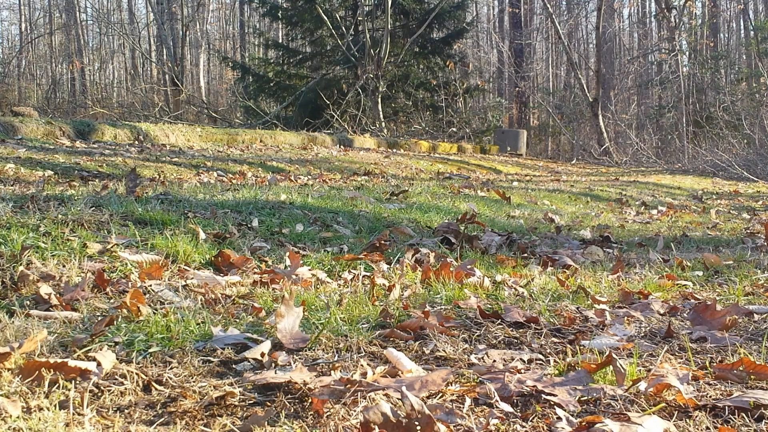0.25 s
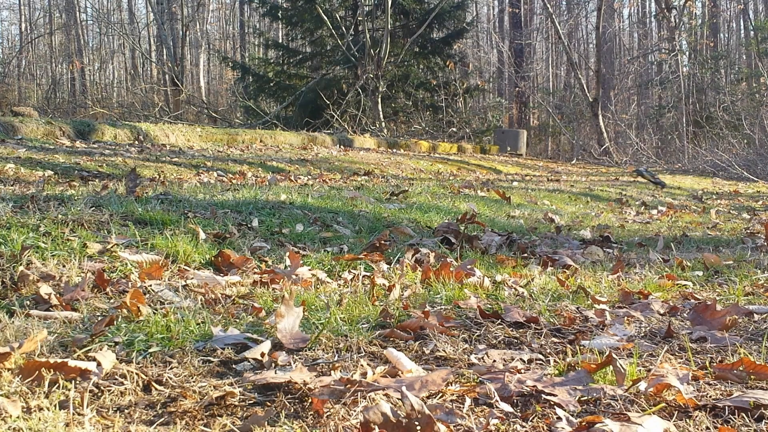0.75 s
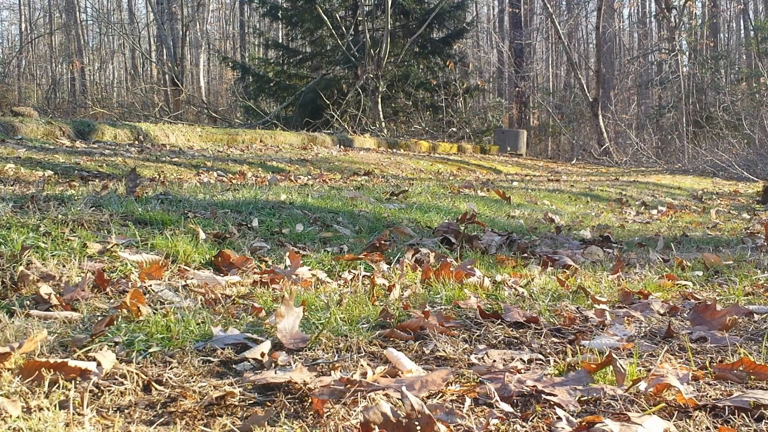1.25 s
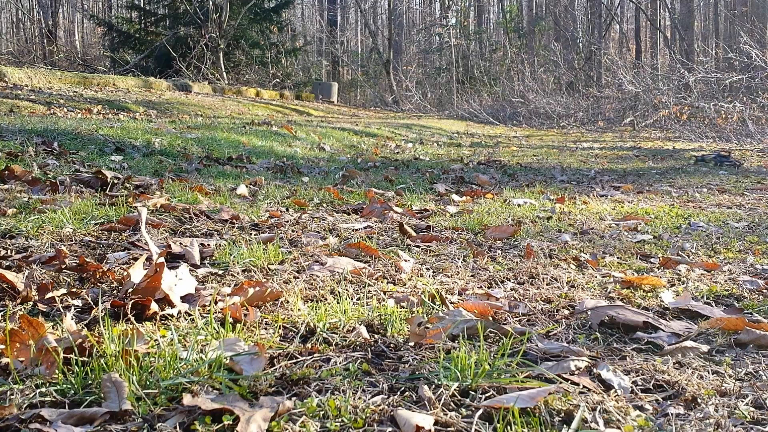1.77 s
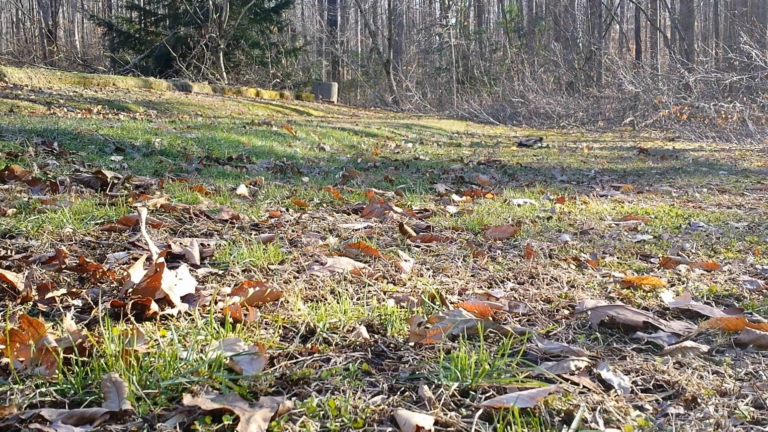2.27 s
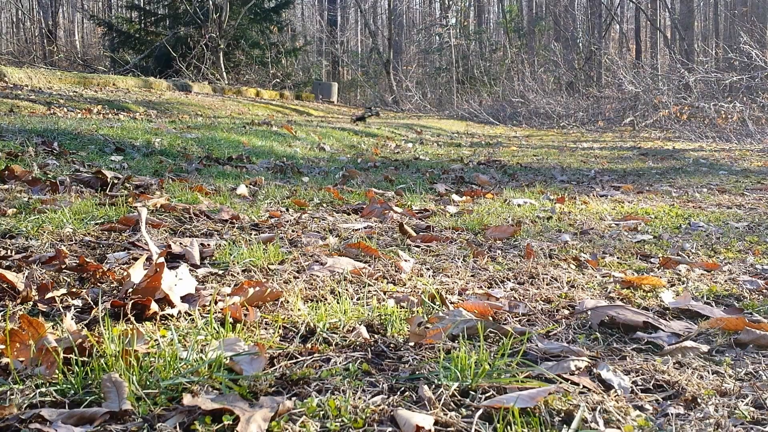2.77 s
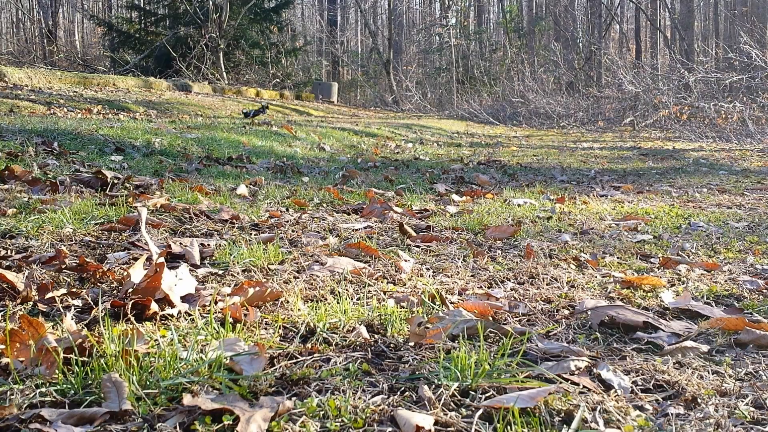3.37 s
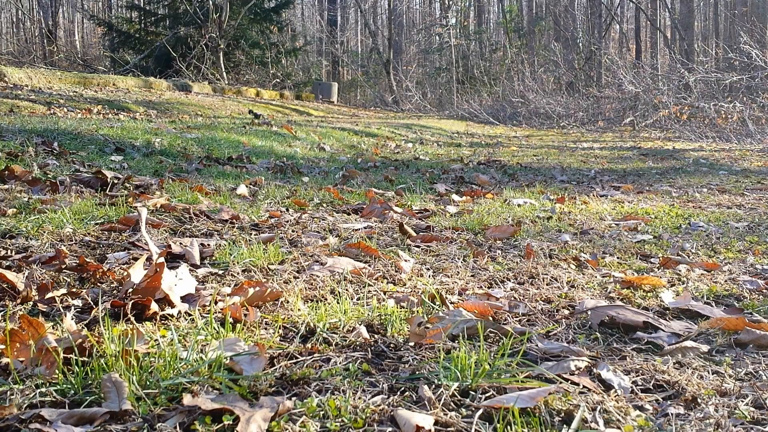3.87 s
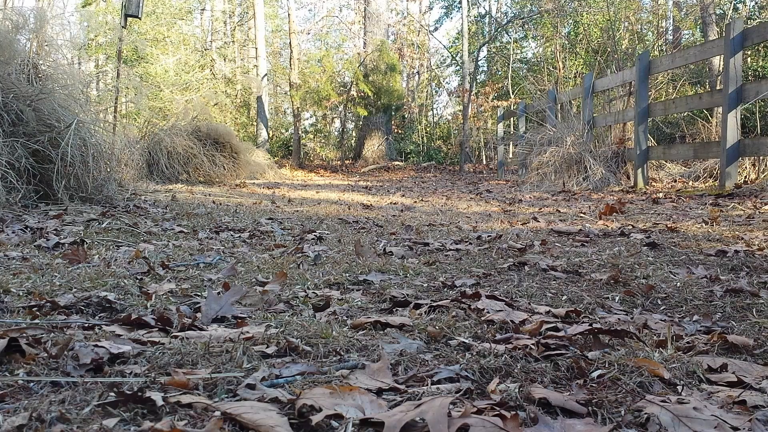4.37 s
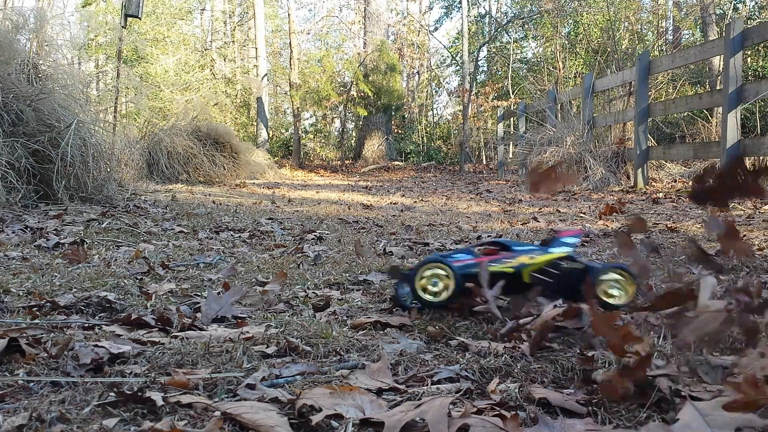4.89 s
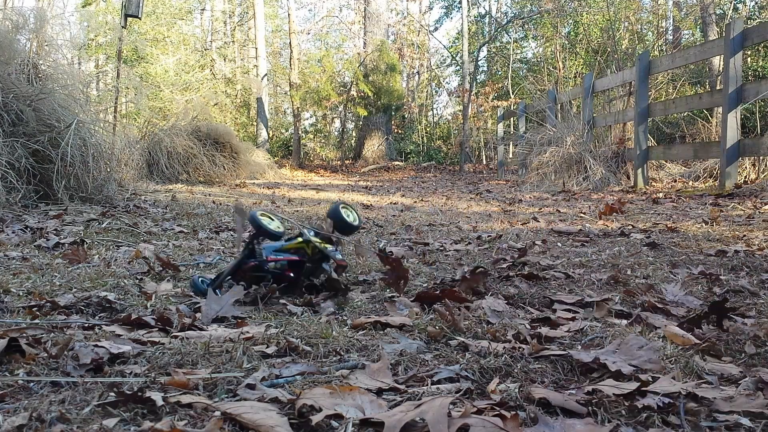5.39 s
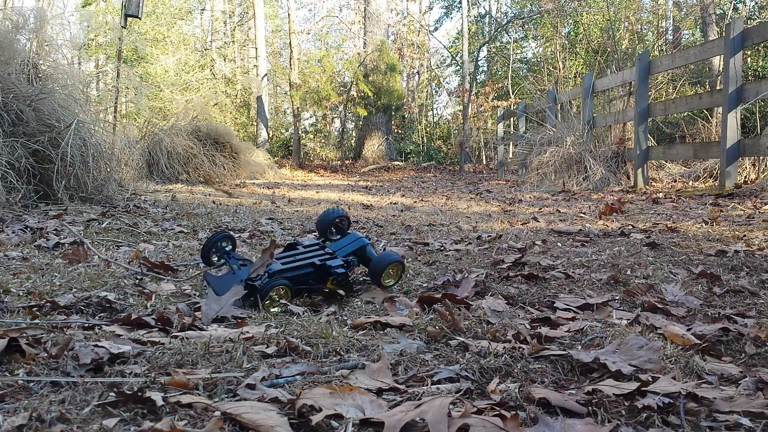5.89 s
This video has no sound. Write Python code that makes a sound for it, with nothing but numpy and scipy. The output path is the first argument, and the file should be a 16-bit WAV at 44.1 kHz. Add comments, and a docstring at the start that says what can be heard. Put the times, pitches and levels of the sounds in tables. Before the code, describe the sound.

A small electric buggy races some way off across a lawn of dry leaves, its tyres rustling, its plastic chassis rattling and bumping, its gears giving tiny high chirps. After about four seconds it is suddenly right at the microphones, crunching loudly through the leaves with a brief motor hum. It flips with a few hollow knocks, and disturbed leaves crackle on. The sound is open-air stereo with a faint low rumble.

```python
"""A small electric buggy on a lawn of dry leaves, heard from a stereo pair of microphones in the open air.
For four seconds it races some way off: tyres crush leaves, the plastic chassis rattles and lands, and the
gears chirp downward as the wheels grip. Then, abruptly, it is right at the microphones, and the motor hums
as the wheels lift. At 5.3 s it flips, its hollow shell knocking on the ground, and stirred leaves crackle
round it. Trees return a faint echo; a low background ducks during the close pass and recovers."""
import sys
import numpy as np
from scipy import signal
from scipy.fft import rfft, irfft
from scipy.io import wavfile
from scipy.ndimage import map_coordinates

SR = 44100
rng = np.random.default_rng(int(sys.argv[2]) if len(sys.argv) > 2 else 0)


def materialize(psi):
    """Save the field psi as 16-bit PCM at rate SR to the path in sys.argv[1].

    A 1-D psi becomes a single channel; in a 2-D psi each row is a channel.
    """
    bounded = np.clip(np.atleast_2d(psi).T, -1, 1)
    quanta = np.round(bounded * 32767).astype(np.int16)
    wavfile.write(sys.argv[1], SR, quanta)


N = 270731
T = np.arange(N) / SR
CLOSE_S = 4.072   # from here on the car is close to the microphones
USUAL_RUSTLE_DB, USUAL_PITCH_HZ = -40, 6500

# Leaves under the tyres, far off and close by. Each row: time in seconds, relative level in dB.
FAR_RUSTLE_LEVEL = [(0.0, -31), (0.07, -40), (0.51, -48.5), (0.76, -46.5), (0.99, -46.5), (1.53, -44.5),
                    (1.85, -41), (2.14, -49.5), (2.37, -47.5), (2.53, -38), (2.69, -42.5), (2.85, -52.5),
                    (3.36, -56.5), (3.56, -58.5), (3.84, -61.5), (4.06, -69)]
CLOSE_RUSTLE_LEVEL = [(4.08, -25), (4.11, -20), (4.51, -23), (4.55, -22), (4.98, -38.5), (5.13, -40.5),
                      (5.41, -48), (5.42, -38.5), (5.46, -46.5), (5.98, -33), (6.0, -40), (6.14, -37.5)]
# Colour of the leaves at each distance. Each row: frequency in Hz, relative level in dB.
FAR_LEAF_SPECTRUM = [(1000, -30), (1700, -20), (2300, -14), (3100, -9.5), (3700, -10.5), (4800, -10),
                     (5800, -0.5), (6600, 6.5), (7400, 3.5), (8800, -2.5), (11500, -1.5), (15000, -4.5),
                     (15800, -4)]
CLOSE_LEAF_SPECTRUM = [(880, -62.5), (1500, -21), (2900, -10.5), (4430, -12), (6450, 4), (8330, -14),
                       (14700, -28), (15800, -52)]
# Pitch of the rustle, lower where the leaves are larger. Each row: time in seconds, pitch in Hz.
RUSTLE_PITCH = [(0, 6656), (.5, 6824), (.8, 6060), (1.15, 5930), (1.3, 6490), (2.64, 6733), (2.8, 5866),
                (3.3, 6382), (4.25, 6513), (4.42, 6124), (4.55, 6640), (4.9, 6870), (5.1, 6414),
                (6.14, 6550)]
# A wheel crushes a clump of leaves. Each row: time in seconds, relative peak in dB.
LEAF_CLUMPS = [(0.05, -36), (0.087, -37), (0.44, -45), (0.505, -47), (0.765, -53), (0.81, -46),
               (0.843, -41), (0.895, -40), (0.945, -42.5), (1.026, -38), (1.098, -39.5), (1.16, -42.5),
               (1.207, -33), (1.226, -38), (1.975, -35), (2.382, -40), (2.52, -37), (2.8, -42),
               (2.893, -41.5), (3.03, -46), (3.335, -59), (3.635, -59), (4.165, -30), (4.55, -20.5),
               (4.61, -20), (4.92, -45), (5.16, -34), (5.43, -56), (5.69, -40), (5.98, -50)]
# Single leaves and twigs snap.
# Each row: start in seconds, relative peak in dB, ring in Hz, left over right in dB.
LEAF_SNAPS = [(0.017, -22.5, 7300, -13), (0.1803, -29.5, 6900, -14), (0.6524, -27.5, 6540, 5),
              (0.8358, -31.5, 6200, 1.5), (1.1954, -26, 6900, -3), (1.2186, -25, 6550, 1),
              (1.8562, -24.5, 6860, 2), (1.8935, -17.5, 6780, 3.5), (1.924, -22, 8000, 0),
              (1.9501, -25, 6540, -2), (2.575, -33, 6800, 1), (2.6511, -37, 6850, -1),
              (2.7977, -31.5, 5200, 4), (2.826, -28, 5300, -1), (2.8813, -33, 5700, -21),
              (3.117, -36, 5960, 11), (4.1558, -15, 6360, 1.5), (4.3028, -13, 6463, 4.5),
              (4.3666, -14.5, 6096, 10), (4.4128, -14.5, 5830, 11), (4.5442, -11, 6500, -15),
              (4.6586, -16.5, 6460, 2), (4.7176, -18, 5950, 0), (5.0527, -27, 6500, -4.5),
              (5.8387, -24.5, 6540, -12), (5.8771, -23, 7160, -12), (5.9415, -26, 6760, 3),
              (5.984, -21, 6390, 14)]
# The ground shakes the chassis on the distant run. Each row: time in seconds, relative level in dB.
FAR_SHAKE_LEVEL = [(0.0, -46), (0.46, -50), (0.64, -56), (1.04, -54), (1.76, -43.5), (2.53, -47.5),
                   (2.66, -55), (3.55, -53), (3.83, -57), (4.06, -65)]
# Colour of the chassis at each distance. Each row: frequency in Hz, relative level in dB.
FAR_CHASSIS_SPECTRUM = [(40, -24), (90, -19), (180, -6), (280, -4.5), (480, -3.5), (750, 0.5), (1100, 0.5),
                        (1450, -0.5), (1900, -9.5), (3000, -16)]
CLOSE_CHASSIS_SPECTRUM = [(40, -35), (90, -11), (150, -8.5), (300, -3), (480, 0.5), (750, 2.5), (1100, 5),
                          (1500, 4.5), (2100, -5.5), (3200, -5)]
# Wheels and chassis land. Each row: start in seconds, relative peak in dB.
LANDING_BLOWS = [(0.015, -35), (0.078, -36.5), (0.226, -35.5), (0.388, -36.5), (0.482, -37), (0.545, -41),
                 (0.603, -39), (0.833, -40), (1.2, -30), (1.212, -50), (1.307, -33.5), (1.386, -34.5),
                 (1.48, -49), (1.533, -34.5), (1.654, -36.5), (1.734, -33), (1.875, -33), (1.925, -37),
                 (1.967, -32), (2.137, -34.5), (2.314, -35.5), (2.373, -38.5), (2.445, -38), (2.504, -34),
                 (2.574, -37), (2.618, -37), (3.021, -38.5), (3.113, -32.5), (3.16, -32.5), (3.322, -38.5),
                 (3.568, -44.5), (3.608, -34), (3.689, -41), (4.093, -25), (4.123, -33), (4.201, -24.5),
                 (4.298, -26.5), (4.342, -32.5), (4.5, -29), (4.643, -27.5), (4.88, -35.5), (5.129, -43.5),
                 (5.48, -41.5)]
# Thin high tones: falling gear chirps, and a few nearly steady rings near 7 and 9 kHz.
# Each row: start in seconds, length in seconds, starting pitch in Hz,
# share of pitch lost from 0 to 1, relative level in dB.
HIGH_TONES = [(0.066, 0.022, 9220, 0.03, -47), (0.124, 0.031, 7100, 0.05, -39.5),
              (0.19, 0.33, 7150, 0.15, -50), (0.233, .017, 9500, 0.42, -42.5),
              (0.457, 0.034, 8300, 0.2, -51), (0.948, 0.35, 9270, 0.03, -61.5),
              (1.397, .018, 10000, 0.39, -43.5), (1.532, 0.04, 10450, 0.21, -46),
              (1.75, .023, 9240, 0.3, -41.5), (2.145, .028, 9300, 0.2, -39),
              (2.503, 0.012, 9400, 0.29, -37), (2.616, 0.014, 9750, 0.31, -35.5),
              (2.639, 0.029, 7000, 0.01, -37.5), (3.02, 0.017, 11900, 0.18, -55),
              (3.168, 0.013, 11400, 0.17, -61), (3.624, 0.042, 9580, 0.3, -54),
              (4.876, 0.073, 7640, 0.08, -36.5), (5.325, 0.01, 10900, .1, -57),
              (5.414, .011, 7800, 0, -39.5)]
# The motor as the car passes. Each row: time in seconds, speed in turns per second.
MOTOR_SPEED = [(4.71, 344), (4.74, 308), (4.775, 374), (4.79, 450), (4.803, 460), (4.82, 365), (4.85, 312),
               (4.88, 320), (4.94, 360)]
# What the shell radiates of the motor's harmonics. Each row: frequency in Hz, relative gain in dB.
SHELL_RESPONSE = [(200, -6), (320, -8), (450, 5.5), (680, 6.5), (920, 2.5), (1150, -2), (1450, -11),
                  (2200, -13), (4000, -42)]
# The shell strikes the ground as the car flips. Each row: time in seconds, relative strength in dB.
TUMBLE_BLOWS = [(5.304, -35), (5.327, -37.5), (5.331, -27.5), (5.338, -28), (5.346, -29.5), (5.481, -41)]
# Modes of the shell. Each row: frequency in Hz, relative level in dB, seconds to fall 60 dB.
SHELL_RESONANCES = [(427.4, -12, 0.047), (584.5, -11, 0.037), (726, -8, 0.056), (824, -6, 0.071),
                    (1009, -5, 0.051), (1147, 5, 0.033), (1440, 0.5, 0.032), (1750, -8, 0.022),
                    (2130, 11, 0.02)]
# Bearing of the car. Each row: time in seconds, lead of the left microphone in milliseconds.
LEFT_LEAD = [(0, 0.015), (.7, 0.099), (1.6, 0.18), (3.3, -0.086), (4.06, -.083), (4.08, 0.35), (4.6, 0.32),
             (5.1, -0.086), (5.5, 0.18), (6.14, 0.049)]
# Level of the low background as heard, ducking during the loud close pass and then recovering.
# Each row: time in seconds, relative level in dB.
BACKGROUND_LEVEL = [(0, -54.5), (2.7, -51.5), (4.06, -56), (4.1, -56), (4.75, -61), (4.95, -73),
                    (5.35, -66), (6.14, -51.5)]
# Colour of that background. Each row: frequency in Hz, relative level in dB.
BACKGROUND_SPECTRUM = [(20, -1), (40, -8.5), (70, -2.5), (125, 2), (200, -7.5), (400, -15.5), (800, -29),
                       (1200, -21.5), (1800, -23.5), (6000, -42), (15000, -32.5)]


def leaves(rustle_db, spectrum, per_s, t60, hiss, levels_db, crunch_follows, crisp_follows):
    """Tyres crush leaves: tiny fractures over a smooth hiss, as low crunch, middle and crisp top."""
    swing_db = rustle_db - USUAL_RUSTLE_DB
    registers = [(1100, 4500, USUAL_RUSTLE_DB + crunch_follows * swing_db),
                 (4500, 8500, with_clumps(rustle_db)),
                 (8500, 17000, USUAL_RUSTLE_DB + crisp_follows * swing_db)]
    # reading the noise faster or slower moves its resonances with the size of the leaves
    leaf_to_leaf = 1 + 0.019 * wander(12.44, 79)
    position = np.cumsum(leaf_to_leaf * in_time(RUSTLE_PITCH) / USUAL_PITCH_HZ) % (N - 1)
    noise = coloured(rng.standard_normal((2, N)), spectrum)
    noise = np.array([map_coordinates(channel, [position], order=2) for channel in noise])
    shared_fractures = grains(per_s, t60, spread_db=2.5)
    out = 0
    for (low_hz, high_hz, curve_db), level_db in zip(registers, levels_db):
        power = hiss + shared_fractures + grains(per_s, t60, spread_db=2.5)
        lumps_db = wander(4, 22)   # the leaves lie unevenly
        crackle = rms_one(band(noise, low_hz, high_hz, order=4) * np.sqrt(power))
        out = out + from_db(curve_db + level_db + lumps_db) * crackle
    return out * panned(0.5 + 9.5 * in_time(LEFT_LEAD))


def with_clumps(rustle_db, swell_s=0.013):
    """Each crushed clump adds a brief swell to the rustle's level in dB."""
    power = from_db(rustle_db) ** 2
    for s, db in LEAF_CLUMPS:
        span = slice(max(int((s - .1) * SR), 0), int((s + .1) * SR))
        power[span] += from_db(db) ** 2 * np.exp(-((T[span] - s) / swell_s) ** 2)
    return 10 * np.log10(power)


def snaps(t60, crack_db, tail_db, tail_t60, level_db):
    """A stiff leaf breaks: a broad crack, a brief ring and a very faint ringing tail near 6.3 kHz."""
    out, t = np.zeros((2, N)), T[:SR // 16]
    decay = from_db(-60 * t / t60)
    for s, db, hz, pan_db in LEAF_SNAPS:
        flutter, crack, tail = rng.standard_normal((3, 2, len(t)))
        burst = rms_one(band(flutter, hz * 0.974, hz * 1.033, order=1)) * decay
        burst += from_db(crack_db) * band(crack * decay, 4700, 11800)
        burst /= np.abs(burst).max(axis=1, keepdims=True)
        ringing_tail = from_db(tail_db - 60 * t / tail_t60) * band(tail, 6340, 6350, order=1)
        add(out, s, from_db(db + level_db) * panned(pan_db) * (burst + ringing_tail))
    return out


def chassis(shake_db, spectrum, per_s, spread_db, t60, smooth, alike, pan_db):
    """Tread and loose suspension parts knock on the plastic tub in quick uneven succession."""
    knocks = rms_one(stereo_noise(alike) * np.sqrt(smooth + grains(per_s, t60, spread_db)))
    return from_db(shake_db) * coloured(knocks, spectrum) * panned(pan_db)


def landings(rise_s, t60, level_db, scuff_db):
    """The suspension bottoms out: a dense clatter swells and dies, with a scuff of the tyres."""
    power = np.zeros(N)
    for s, db in LANDING_BLOWS:
        start = round(s * SR)
        t = T[:min(SR // 3, N - start)]
        blow = (1 - np.exp(-t / rise_s)) * from_db(-60 * t / t60)
        power[start:start + len(t)] += (from_db(db + level_db) * blow / blow.max()) ** 2
    thud = over_lawn(coloured(stereo_noise(0.999) * np.sqrt(power), FAR_CHASSIS_SPECTRUM))
    scuff = from_db(scuff_db) * band(stereo_noise(0) * np.sqrt(power), 3090, 8300, order=1)
    return (thud + scuff) * panned(2.0)


def chirps_and_rings(blur_depth, blur_hz, level_db):
    """Falling gear chirps and a few nearly steady rings, blurred differently at each microphone."""
    out = np.zeros((2, N))
    lowpass = signal.butter(2, blur_hz, fs=SR, output="sos")
    for s, length_s, start_hz, drop, db in HIGH_TONES:
        along = np.linspace(0, 1, int(length_s * SR))
        phase = 2 * np.pi * np.cumsum(start_hz * (1 - drop * along)) / SR
        blur = blur_depth * rms_one(signal.sosfilt(lowpass, rng.standard_normal((2, 2, len(along)))))
        tone = (1 + blur[0]) * np.sin(phase) + blur[1] * np.cos(phase)
        add(out, s, from_db(db + level_db) * rms_one(tone) * np.sin(np.pi * along))
    return out * panned(-3.5)


def motor(peak_s, wobble, rough, level_db, rise_db_per_s=450, fade_db_per_s=128):
    """Imbalance shakes the shell once a turn; the motor races while the wheels are off the ground."""
    swell_db = np.minimum(rise_db_per_s * (T - peak_s), fade_db_per_s * (peak_s - T))
    jitter, judder = rms_one(band(rng.standard_normal((2, N)), 24, 158.4))
    phase = 2 * np.pi * np.cumsum(in_time(MOTOR_SPEED) * (1 + wobble * jitter)) / SR
    harmonics = sum(np.sin(k * phase + rng.uniform(0, 2 * np.pi)) for k in range(1, 9))
    running = (T > MOTOR_SPEED[0][0]) & (T < MOTOR_SPEED[-1][0])
    hum = coloured(harmonics * (1 + rough * judder), SHELL_RESPONSE)
    return running * from_db(swell_db + level_db) * hum / hum[running].std() * panned(1.0)


def tumble(contact_hz, level_db):
    """Soft blows on the hollow shell, each striking the modes with strengths of its own."""
    s, db = np.transpose(TUMBLE_BLOWS)
    starts = np.round(s * SR).astype(int)
    out = 0
    for hz, mode_db, t60 in SHELL_RESONANCES:
        clicks = np.zeros(N)
        clicks[starts] = from_db(db + mode_db + rng.normal(0, 2.01, len(s))) * rng.choice([-1, 1], len(s))
        out = out + ring(clicks, hz, t60)
    return from_db(level_db) * band(out, 330, contact_hz)


def over_lawn(x, edge_hz=1206, nearest_s=1.87, near_for_s=0.57):
    """Soft ground swallows the top of the rattle on its way to the microphones, more so from far off."""
    nearness = np.exp(-np.minimum(((T - nearest_s) / near_for_s) ** 4, 30))   # on the distant run
    clear_share = np.where(T < CLOSE_S, np.maximum(nearness, 0.035), 0.72)
    dull = signal.sosfiltfilt(signal.butter(4, edge_hz, fs=SR, output="sos"), x)
    return clear_share * x + (1 - clear_share) * dull


def from_bearing(x):
    """The sound reaches the two microphones at different moments."""
    lead_s = in_time(LEFT_LEAD) / 1000
    return np.array([np.interp(T + side * lead_s / 2, T, channel) for channel, side in zip(x, (1, -1))])


def woods(x, t60, level_db):
    """Tree trunks scatter a faint, late and duller echo."""
    t = T[:SR]
    scatter = band(rng.standard_normal((2, SR)), 330, 3700, order=1)
    scatter *= from_db(-60 * t / t60) * (1 - np.exp(-t / 0.004))
    scatter /= np.sqrt(np.sum(scatter ** 2, axis=1, keepdims=True))
    return from_db(level_db) * signal.fftconvolve(x, scatter, axes=1)[:, :N]


def low_background():
    """Low noise, nearly alike at both microphones; it ducks during the close pass and recovers."""
    noise = coloured(stereo_noise(0.9), BACKGROUND_SPECTRUM)
    return from_db(in_time(BACKGROUND_LEVEL)) * noise * panned(1.7)


def grains(per_s, t60, spread_db):
    """Power of random short contacts of uneven strength; mean 1."""
    size = rng.exponential(1, N)
    hit = rng.random(N) < per_s / SR
    hits = hit * from_db(spread_db * np.minimum(size, 4.5)) ** 2
    power = signal.lfilter([1], [1, -from_db(-120 / (t60 * SR))], hits + 1e-18)
    return power / power.mean()


def ring(clicks, hz, t60):
    """A unit click sets a sine of height 1 ringing."""
    decay, step = from_db(-60 / (t60 * SR)), 2 * np.pi * hz / SR
    return signal.lfilter([0, np.sin(step)], [1, -2 * decay * np.cos(step), decay ** 2], clicks + 1e-18)


def wander(low_hz, high_hz):
    """Random swing of rms 1 within a range of rates."""
    return rms_one(band(rng.standard_normal(N), low_hz, high_hz))


def stereo_noise(alike):
    """White noise in two channels with a given correlation."""
    mid, side = rng.standard_normal((2, N))
    return np.sqrt((1 + alike) / 2) * mid + np.sqrt((1 - alike) / 2) * side * np.array([[1], [-1]])


def coloured(x, spectrum, size=8192):
    """Causal (minimum-phase) filter with the given spectrum; white noise keeps its power."""
    hz, db = np.transpose(spectrum)
    bin_hz = np.arange(size // 2 + 1) * SR / size
    gain = rms_one(from_db(np.interp(np.log(bin_hz + 1), np.log(hz), db)))
    cepstrum = irfft(np.log(gain))
    cepstrum[1:size // 2] *= 2
    cepstrum[size // 2 + 1:] = 0
    response = irfft(np.exp(rfft(cepstrum)))[:size // 2]
    return signal.oaconvolve(x, np.array(response, ndmin=x.ndim), axes=-1)[..., :N]


def band(x, low_hz, high_hz, order=2):
    """Butterworth band-pass."""
    return signal.sosfilt(signal.butter(order, [low_hz, high_hz], "band", fs=SR, output="sos"), x)


def panned(db):
    """Left and right gains for a level difference."""
    pair = from_db(np.array([[1], [-1]]) * db / 2)
    return pair / np.sqrt(np.mean(pair ** 2, axis=0))


def add(out, s, sound):
    """Mix a short stereo sound in at s seconds."""
    start = round(s * SR)
    out[:, start:start + sound.shape[1]] += sound[:, :N - start]


def in_time(rows):
    """A curve of (seconds, value) rows at every sample."""
    return np.interp(T, *np.transpose(rows))


def from_db(db):
    """Decibels to gain."""
    return 10 ** (np.asarray(db) / 20)


def rms_one(x):
    """Scale to rms 1."""
    return x / np.sqrt(np.mean(x ** 2) + 1e-20)


def scene():
    """The distant run, then the close one, in the open air."""
    close = np.clip((T - CLOSE_S) / .002, 0, 1)
    far_db, close_db = in_time(FAR_RUSTLE_LEVEL), in_time(CLOSE_RUSTLE_LEVEL)
    far_leaves = leaves(far_db, FAR_LEAF_SPECTRUM, per_s=800, t60=0.022, hiss=1.1,
                        levels_db=(-9.5, 1.5, -13), crunch_follows=0.46, crisp_follows=0.61)
    close_leaves = leaves(close_db, CLOSE_LEAF_SPECTRUM, per_s=1700, t60=0.011, hiss=0.35,
                          levels_db=(-4, 0.5, -7), crunch_follows=0.96, crisp_follows=0.98)
    far_rattle = chassis(in_time(FAR_SHAKE_LEVEL) + 2.5, FAR_CHASSIS_SPECTRUM, per_s=110,
                         spread_db=-2, t60=0.097, smooth=1.0, alike=0.86, pan_db=1.5)
    close_shake_db = -45 + 0.78 * (close_db - USUAL_RUSTLE_DB)   # the rattle follows the rustle
    close_rattle = chassis(close_shake_db, CLOSE_CHASSIS_SPECTRUM, per_s=200,
                           spread_db=-0.5, t60=0.071, smooth=0.46, alike=1.0, pan_db=3.5)
    body = (1 - close) * over_lawn(far_rattle) + close * close_rattle
    body += landings(rise_s=0.0066, t60=0.15, level_db=-2, scuff_db=-4)
    body += motor(peak_s=4.752, wobble=0.012, rough=0.27, level_db=-28.5)
    body += tumble(contact_hz=1190, level_db=-5)
    car = from_bearing(body) + (1 - close) * far_leaves + close * close_leaves
    car += chirps_and_rings(blur_depth=1.45, blur_hz=330, level_db=5.5)
    car += snaps(t60=0.014, crack_db=-7, tail_db=-14, tail_t60=0.04, level_db=4.5)
    return car + low_background() + woods(car, t60=0.27, level_db=-22.5)


def record(dry):
    """At the recorder: a low cut against wind, rounded peaks, and a steep cut of the top."""
    low_cut_hz, ceiling, top_hz = 38, 0.81, 15800
    low_cut = signal.sosfilt(signal.butter(2, low_cut_hz, "high", fs=SR, output="sos"), dry)
    rounded = ceiling * np.tanh(low_cut / ceiling)
    return signal.sosfilt(signal.ellip(10, .1, 80, top_hz, fs=SR, output="sos"), rounded)


dry = scene()
out = record(dry)
materialize(out)
```